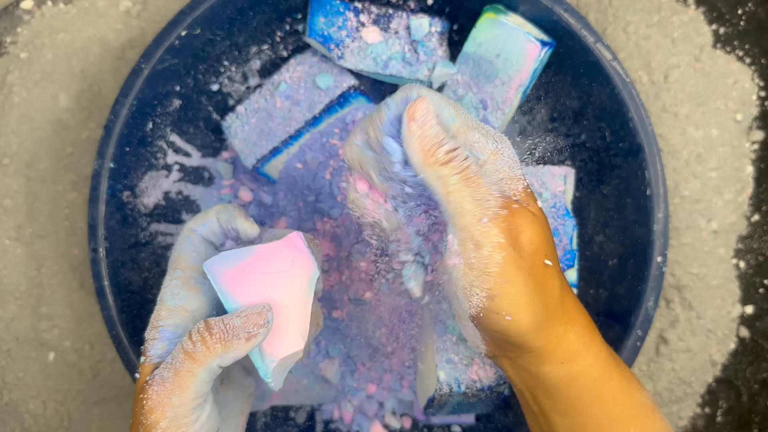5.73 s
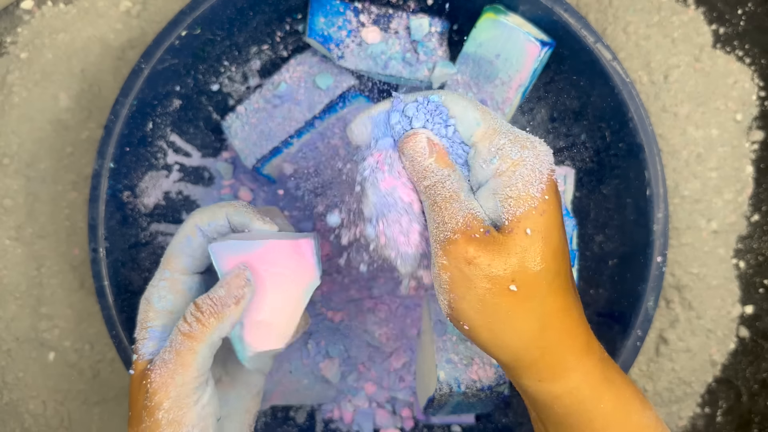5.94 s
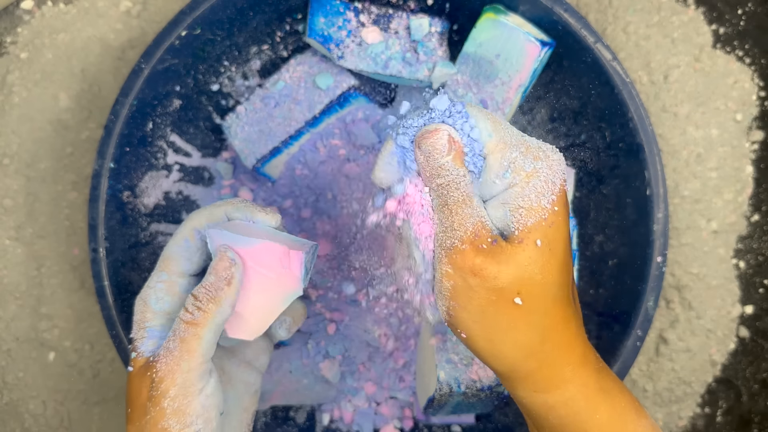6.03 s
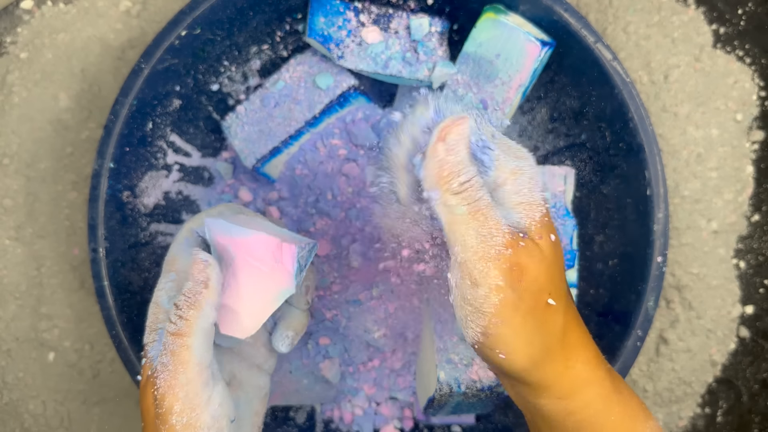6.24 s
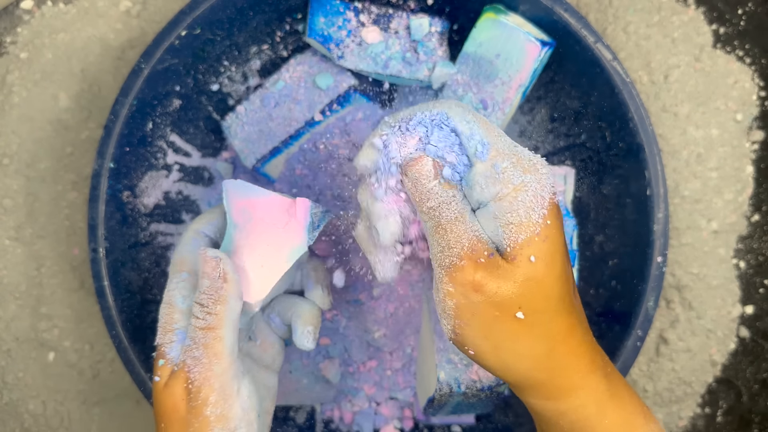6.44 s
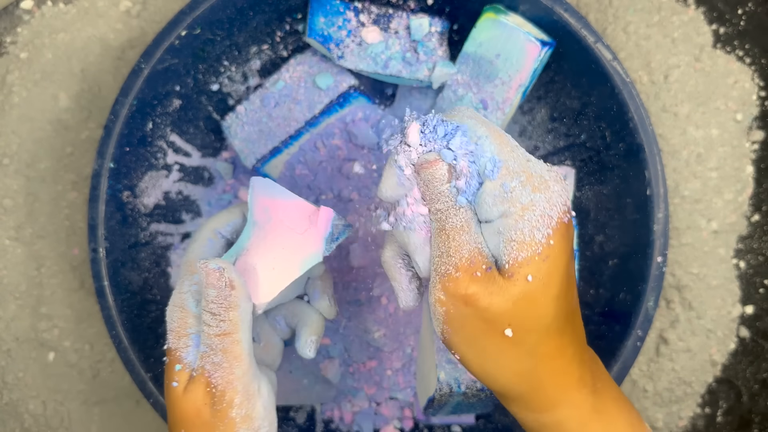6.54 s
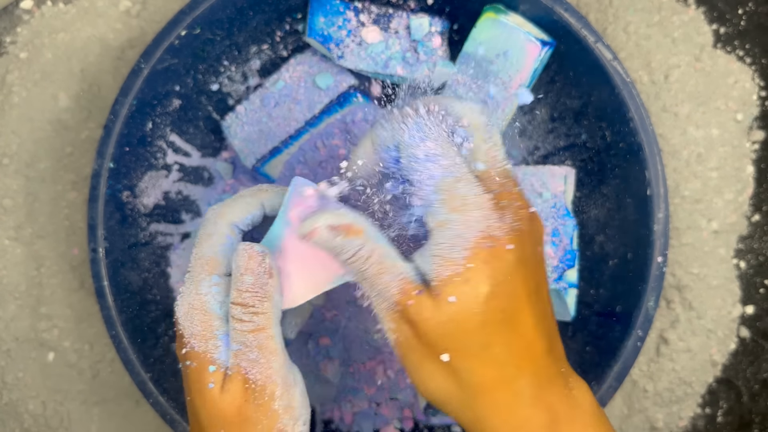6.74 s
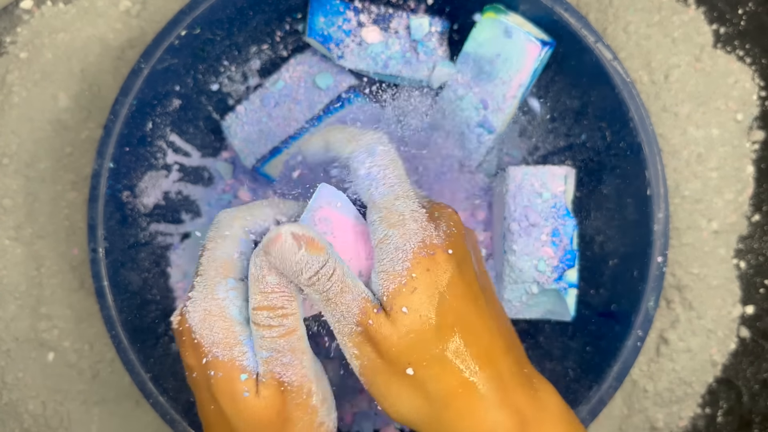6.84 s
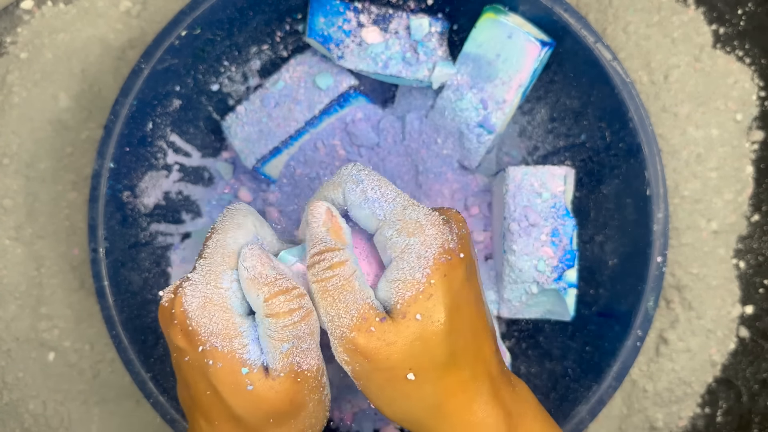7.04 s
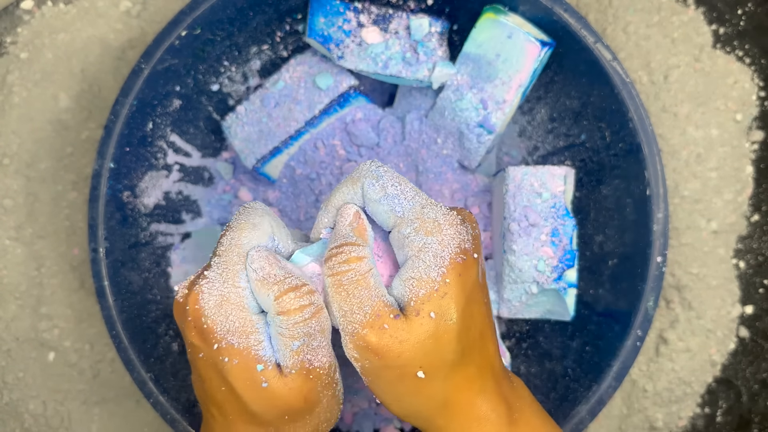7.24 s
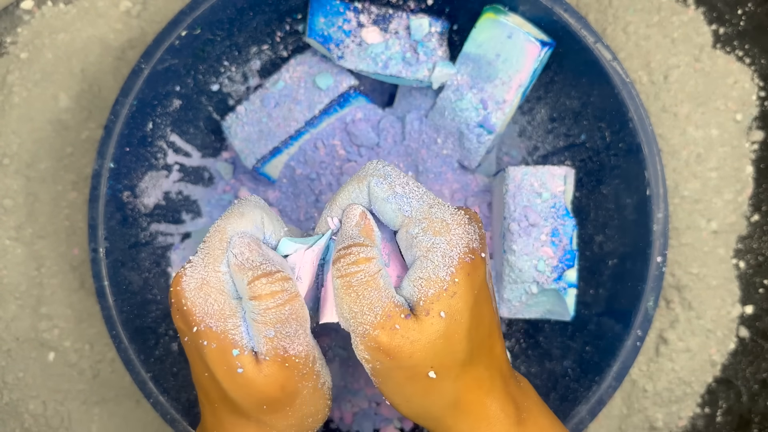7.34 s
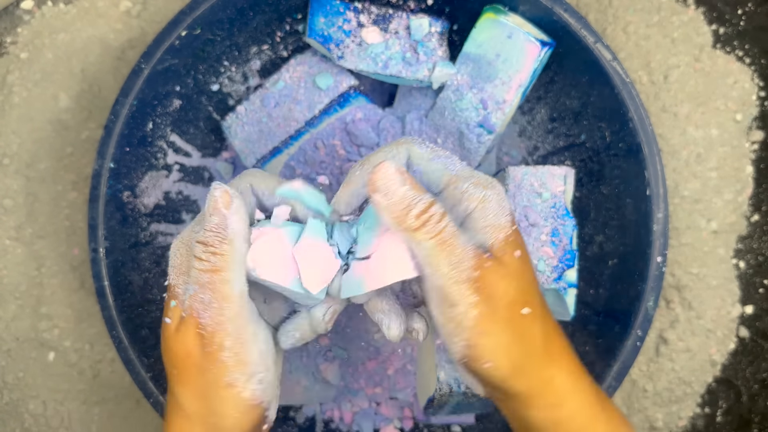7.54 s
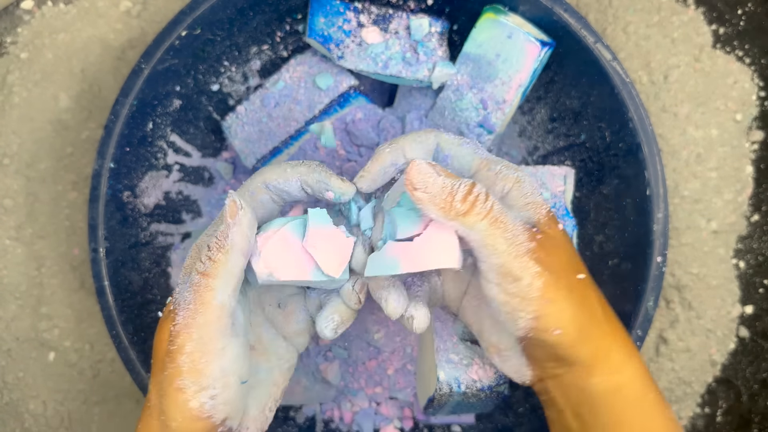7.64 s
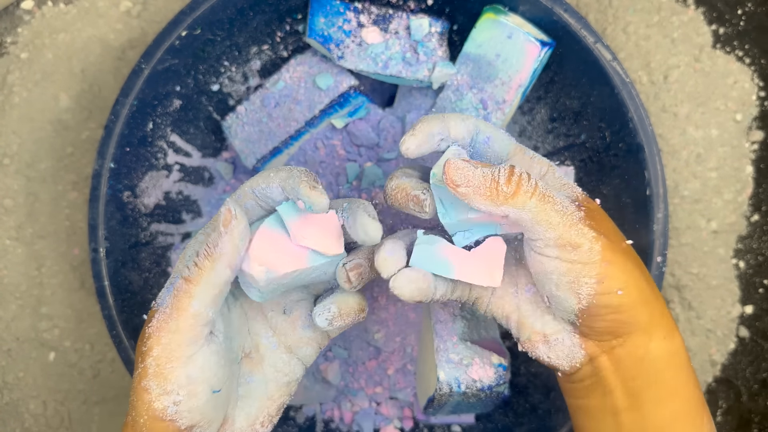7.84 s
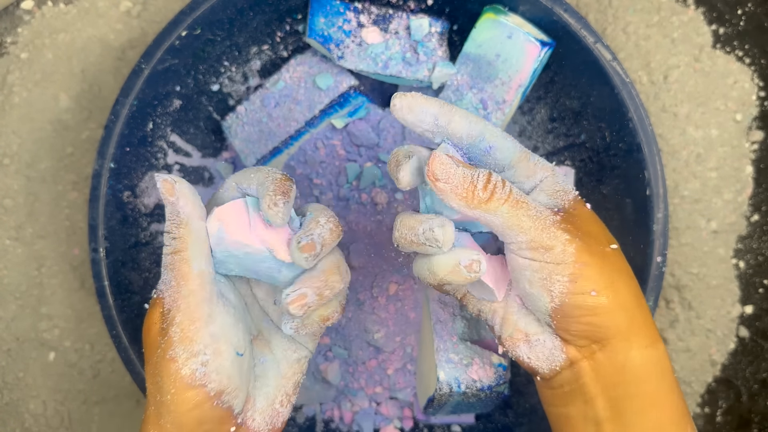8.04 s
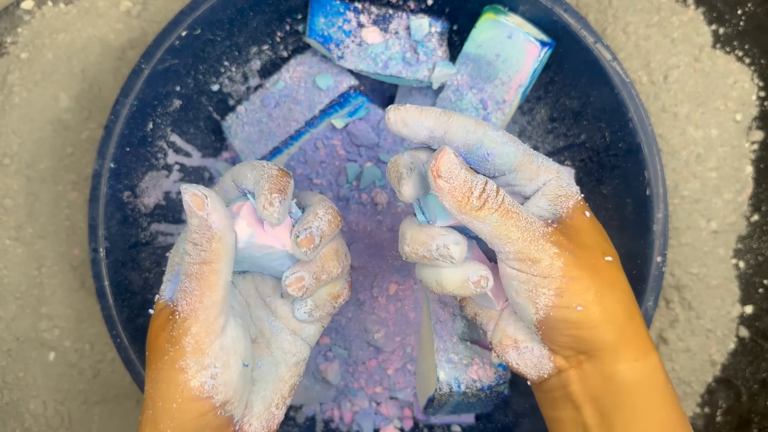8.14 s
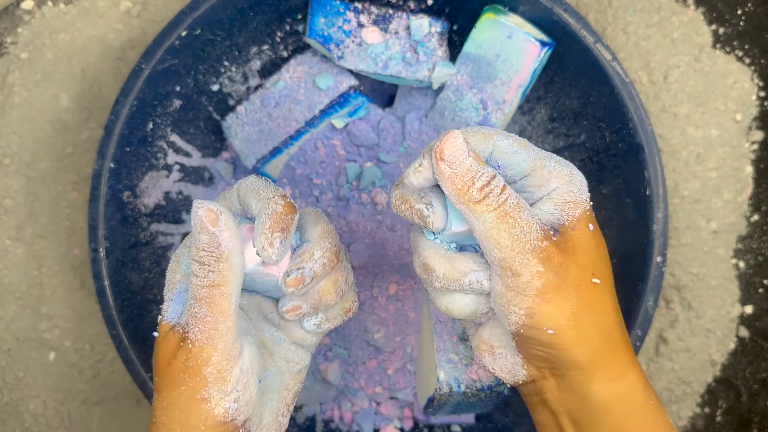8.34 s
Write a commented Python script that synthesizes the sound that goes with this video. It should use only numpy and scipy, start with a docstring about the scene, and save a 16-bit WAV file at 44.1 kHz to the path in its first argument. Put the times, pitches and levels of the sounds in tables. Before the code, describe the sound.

Very close stereo sound of two hands breaking soft chalk over a plastic basin. A violent dry crack comes early, then scattered smaller snaps and gritty squeezing, a dense burst of crunching past the middle, lumps dropping on powder, a dull block collapse and final crackles. Hard walls add a short tail; a distant engine idles faintly.

```python
"""In a hard-walled room, two hands snap and crush soft gym chalk over a plastic basin, close to two ports.
Each fracture is a shaped noise burst: a dry crack, a run of microcracks and a spray of splinters.
Powder, grit and falling crumbs are swarms of tiny ringing clicks; lumps landing are damped resonances.
Faces shear in gritty rushes or squeak faintly, and one block caves in; dense echoes add a short tail.
Behind lie a far idling engine built from sine orders, a mains tone, and noise for rumble and hiss."""
import sys
import numpy as np
from scipy import signal
from scipy.fft import rfft, irfft, next_fast_len
from scipy.io import wavfile

SR = 44100
rng = np.random.default_rng(int(sys.argv[2]) if len(sys.argv) > 2 else 0)


def output_pcm(signal):
    """Save a mono or channel-first signal as 16-bit PCM at the path in sys.argv[1].

    Samples are clipped to [-1, 1] before scaling.
    """
    pcm = np.clip(np.atleast_2d(signal).T, -1, 1) * 32767
    wavfile.write(sys.argv[1], SR, np.round(pcm).astype(np.int16))


N = 369540

# far engine speed: time_s, firing_rate_hz
ENGINE_SPEED = [(0, 16.4), (.45, 16.54), (1.2, 18.1), (1.6, 16.65), (2.6, 17.5), (3.6, 17.69), (4.6, 19.2),
                (5.1, 17.1), (6.6, 18.82), (7.1, 18.2), (7.7, 17.7), (8.38, 17.3)]
# main exhaust orders: time_s, third_order_db, fourth_order_db, fifth_order_db
ENGINE_LEVEL = [(0, -67, -43, -35.5), (.35, -60, -41.5, -34.5), (.48, -60, -46, -48),
                (.63, -61, -46, -36.5), (1.1, -49, -57, -39.5), (1.23, -64, -43, -50), (1.5, -55, -53, -43),
                (1.9, -59.5, -43.5, -40.5), (2.43, -57.5, -44, -36), (2.62, -50.5, -49.5, -40.5),
                (3.04, -45, -40.5, -39.5), (3.45, -52, -42.5, -36.5), (3.78, -54.5, -41.5, -47),
                (4.02, -46, -41.5, -40), (4.45, -60, -51.5, -45), (4.85, -52, -51.5, -47.5),
                (5.3, -62, -47.5, -51), (5.8, -57, -46.5, -57.5), (6.03, -45, -46, -58.5),
                (6.22, -50, -64, -63.5), (6.42, -44.5, -54, -54.5), (6.82, -47, -48, -56),
                (7.05, -52, -68, -61), (7.35, -42.5, -51, -57), (7.65, -56, -63.5, -65),
                (7.8, -48, -53, -61), (8.38, -49, -65, -63.5)]
# weak engine orders: multiple_of_firing_rate, relative_level_db
ENGINE_OVERTONES = [(2, -70), (7, -68.5), (8, -66.5), (9, -68), (10, -63.5), (12, -71.5)]
# spectrum of the surroundings: frequency_hz, relative_density_db
AIR_SPECTRUM = [(15, -27), (45, -6), (90, 4), (150, -10), (300, -14), (600, -21.5), (2000, -31.5),
                (8000, -39.5), (11500, -64.5), (16000, -48)]
HUM_HZ, HUM_DB = 119.3, -65.5

# squeezes of the hand: start_s, hold_end_after_s, relative_grit_db, relative_powder_db
SQUEEZES = [(0, 0.14, -69.5, -69.5), (0.134, 0.12, -82, -66), (0.252, 0.059, -68.5, -54.5),
            (0.379, 0.23, -48.5, -55.5), (0.584, 0.36, -55.5, -55.5), (0.936, 0.33, -53.5, -53.5),
            (1.269, 0.2, -62, -68.5), (1.505, 0.13, -58, -62.5), (1.872, 0.28, -56.5, -58),
            (2.421, 0.12, -63, -57), (2.695, 0.026, -65, -70), (3.297, 0.11, -54.5, -51.5),
            (3.48, 0.14, -60, -54.5), (4.051, 0.082, -63.5, -61), (4.29, 0.23, -64.5, -60),
            (4.525, 0.33, -48, -50), (4.851, 0.23, -51.5, -53.5), (5.124, 0.16, -55.5, -59.5),
            (5.277, .35, -51.5, -55), (5.685, 0.53, -57.5, -56.5), (6.17, 0.34, -57.5, -68.5),
            (6.529, 0.17, -57, -58), (6.787, 0.17, -54, -58), (7.405, .2, -82, -68.5),
            (7.727, 0.27, -65, -57.5), (7.948, 0.31, -59, -57.5), (8.217, 0.2, -57, -55)]
GRIP_S, LET_GO_S = 0.025, 0.031  # linear rise, and time constant of the release
RESTING_GRIT_DB, RESTING_POWDER_DB = -87, -80  # chalk shifting in a loose hand, relative levels
# spectra of coarse grit, fine powder and a single crumb's tick: frequency_hz, relative_density_db
GRIT_SPECTRUM = [(150, -28.5), (500, -11), (1150, -6), (1650, -5), (2400, 0), (3500, -5), (5000, -12),
                 (8000, -27), (16000, -48.5)]
POWDER_SPECTRUM = [(1000, -29.5), (3500, -10), (5000, -18.5), (6700, -2), (9300, -0.5), (10600, -13.5),
                   (12500, -26.5), (15000, 5.5), (16500, -10)]
TICK_SPECTRUM = [(200, -25), (700, -4.5), (1500, -0.5), (2600, 1), (4500, -2.5), (7500, -4.5), (11000, -20),
                 (16000, -18.5)]

# handfuls of crumbs pouring on the heap: start_s, hold_end_after_s, relative_patter_db, relative_clatter_db
SPILLS = [(0, 0.03, -54, -69), (0.496, 0.08, -46, -49), (0.623, 0.27, -59, -67.5),
          (1.739, 0.17, -56, -56.5), (3.412, 0.33, -60, -63.5), (3.64, .1, -54.5, -57.5),
          (3.935, 0.1, -51, -58.5), (4.48, 0.27, -56.5, -59), (5.452, 0.42, -58.5, -58),
          (5.762, 0.16, -56, -50), (5.925, 0.24, -55, -57.5), (6.329, 0.059, -65.5, -60.5),
          (6.806, 0.089, -55, -60), (6.96, 0.037, -67, -55), (8.196, 0.34, -59, -64)]
FALL_S, TRICKLE_S = 0.0067, 0.023  # a handful starts to land, and thins out (time constant)
# spectra of crumbs on the heap and on blocks: frequency_hz, relative_density_db
HEAP_SPECTRUM = [(100, -13.5), (300, 2), (450, 0.5), (630, 2), (850, 0), (1200, -13), (2000, -11.5),
                 (5000, -30.5)]
CLATTER_SPECTRUM = [(350, -23), (750, 3), (1100, 1.5), (1900, -6), (3000, -18.5), (7000, -35)]

# smooth faces rubbing: middle_s, swell_and_fade_s, level_db, middle_pitch_hz, width_hz, glide_hz_per_s
SQUEAKS = [(.02, 0.06, -62.5, 1920, 300, -1), (.227, 0.015, -45.5, 3850, 260, 7000),
           (.278, .01, -52.5, 3760, 700, 0), (3.78, 0.13, -64, 1960, 400, -3),
           (7.42, 0.08, -64, 1776, 340, -300)]
# layers shearing off: middle_s, half_length_s, relative_level_db, pitch_hz
SHEARS = [(0.117, 0.015, -57.5, 2600), (0.314, 0.03, -53, 4000), (0.363, 0.0049, -43.5, 2700),
          (0.70, 0.019, -50.5, 2900), (0.795, 0.026, -47, 3200), (0.873, 0.011, -42.5, 2990),
          (0.93, .012, -50, 5000), (1.015, 0.029, -43, 2988), (1.157, .04, -52.5, 3600),
          (1.369, 0.026, -49.5, 3010), (2.338, 0.011, -54, 6520), (2.431, 0.044, -49.5, 3007),
          (2.509, 0.033, -43.5, 3130), (2.9, 0.016, -53, 2000), (3.199, 0.02, -40, 3130),
          (3.342, 0.027, -41, 7060), (3.52, 0.025, -40.5, 6500), (3.629, 0.024, -46, 3600),
          (3.901, 0.023, -54, 2283), (4.212, 0.03, -38, 4500), (4.636, 0.014, -24, 3440),
          (5.351, 0.019, -48, 3990), (5.966, 0.038, -45, 6500), (6.611, 0.03, -43, 2670),
          (6.779, 0.024, -54, 4500), (6.839, 0.0043, -34, 4800), (6.863, 0.023, -51, 3000),
          (7.082, 0.0077, -58.5, 2000), (7.77, 0.019, -46.5, 3300), (7.831, 0.017, -52, 2600),
          (7.941, 0.017, -48, 5000), (7.988, 0.024, -42, 2650), (8.265, 0.018, -48, 2800)]
# clear fractures: main_break_s, energy_db, piece_pitch_hz, bass_db, treble_db
SNAPS = [(0.3708, 9, 950, -9.5, -10), (0.404, 0, 3900, 7.5, -8.5), (0.415, -2.5, 3614, 4, -4),
         (0.4828, 14.5, 2425, -4.5, -20), (0.484, 14, 8170, 10, -11.5), (0.4885, 11, 1395, -11, -13),
         (0.5638, -7, 1350, -4.5, 0), (0.5713, -7, 1900, 4.5, 10.5), (0.7245, -9, 1540, -4, -17),
         (1.106, -11, 8000, 3, -22.5), (1.121, -21, 3500, -2.5, 0), (1.1531, -16.5, 1184, 3.5, 2.5),
         (1.227, -24, 2140, 3, -10.5), (1.249, -29, 2410, -1.5, -11), (1.496, -25, 1990, 0, -3.5),
         (1.749, -32.5, 2000, -5.5, -2.5), (1.299, -20, 1700, -6, -4), (1.427, -25.5, 1500, -3, -3),
         (1.536, -20, 2180, 1.5, -22.5), (1.563, -19, 1630, 0, 1.5), (1.691, -22, 1735, -0.5, -16.5),
         (1.5942, -16.5, 4590, 8.5, 17), (1.8237, 5.5, 1332, -1.5, -6), (2.031, -12, 2840, -13, -3),
         (2.1011, -8, 1304, 7.5, 13.5), (2.138, -17, 4580, -3.5, -2), (2.486, -8.5, 2610, -18, -11.5),
         (2.5324, -7.5, 1910, 0, 0.5), (2.7583, -24.5, 4550, -4, -12), (2.9622, -14, 6000, -14, 14),
         (2.962, 8, 805, -33.5, 5), (2.9696, -5, 2620, 6.5, -4), (3.227, -11.5, 3640, 3, 9),
         (3.4663, -14.5, 1382, -11, -9), (3.5764, -14, 4010, 21.5, -7), (3.8237, -22, 1630, 22, 16),
         (3.9356, 7, 910, 1.5, 11), (3.941, -2.5, 3274, 24, 1.5), (3.9479, -0.5, 2100, -10.5, -24.5),
         (3.9564, -3.5, 1624, -9, -2), (3.9624, 7.5, 2110, 7, -1.5), (4.1742, -9.5, 1630, 0.5, 1.5),
         (4.452, -0.5, 2700, -22, 11), (4.454, 1.5, 1770, 7.5, 3), (4.4643, 6.5, 797, -8, 8),
         (4.507, -6, 785, 13.5, 22.5), (4.559, -4, 5100, 4.5, -6), (4.5679, -2.5, 802, -3, 0),
         (4.5806, 1.5, 2300, -1, -15), (4.584, 3.5, 4220, 17.5, 3.5), (4.5992, 5, 3700, -3, 14.5),
         (4.605, 8, 802, -17, -6), (4.606, -5, 4550, 16.5, -4), (4.629, 12, 3920, 8, -7),
         (4.6412, 1.5, 4180, 4, -18), (4.7112, 6.5, 1483, -11.5, -2.5), (4.7348, -4.5, 4510, -7.5, -15),
         (4.7648, 5, 2590, -14, -4), (4.7679, 9, 1400, -3, -4), (4.786, 3.5, 6930, -17, -27),
         (4.8142, -1, 4970, 6, -4.5), (4.8801, -1, 4900, -0.5, 2), (4.8981, -0.5, 2240, 5, 5),
         (4.938, 0.5, 2270, -5, 13), (5.0946, -6.5, 4990, 2, -4), (5.1203, -10.5, 3900, -7, -6),
         (5.1718, -17.5, 3670, 11.5, 18.5), (5.246, -18, 2300, -8.5, 0), (5.380, -19.5, 2200, -3, -7.5),
         (5.548, -16.5, 1173, -4, -16.5), (5.582, -28, 1300, -2, -7), (5.646, -9.5, 7400, -4, -15),
         (5.701, -18.5, 1037, -2.5, -1), (5.798, -10.5, 1845, 3, -15), (5.973, -19, 1700, -1, -9.5),
         (6.330, -14.5, 1196, 16.5, -26.5), (6.493, -21, 6770, -7, 3.5), (6.835, -8.5, 4550, -1, -0.5),
         (6.854, -14.5, 1970, -0.5, -16.5), (6.968, -14, 1595, -9.5, -13.5), (7.078, -23.5, 1900, -4, 3.5),
         (7.259, -1, 1017, 17, -5), (7.2632, 0.5, 1715, 13.5, 8.5), (7.3313, -21, 7390, 18, 7),
         (7.712, -19.5, 3640, 35.5, 27.5), (7.821, -18.5, 890, -9, -4), (8.018, -9, 2255, 4, 7.5),
         (8.113, -9, 849, -1.5, 11), (8.202, -10, 3640, -7, 3), (8.2289, 1.5, 1860, -4.5, -13.5),
         (8.284, -2.5, 1200, -14, 4.5), (8.249, -13, 7000, -6, 3.5), (8.287, -3, 4930, 0.5, -5),
         (8.304, -15, 7450, -6, 5), (8.375, -15.5, 1486, 3.5, 2)]
# spectrum common to the fractures: frequency_hz, relative_density_db
CRACK_SPECTRUM = [(60, -14.5), (200, -2), (320, 1), (630, -2.5), (950, -1), (1600, -1.5), (2500, -0.5),
                  (3200, -2.5), (4700, -6), (6500, -3), (8500, -2), (11200, -5), (15500, -6.5)]
# crumbs trickling out of the fist: start_s, hold_end_after_s, level_db
TRICKLES = [(0.979, .4, -60), (1.483, 0.19, -61), (4.95, 0.168, -56), (5.216, 0.64, -53),
            (5.753, .4, -56.5), (6.177, 0.39, -60)]
# their spectrum: frequency_hz, relative_density_db
CRUMB_SPECTRUM = [(300, -22), (800, -5), (1400, 0), (2400, -3.5), (4000, -8.5), (6500, -7), (10000, -20.5),
                  (16000, -31)]
# lumps landing in the basin and dull breaks inside the fist: start_s, energy_db, pitch_hz, bass_db
THUDS = [(1.396, -16, 835, 3), (3.650, -7.5, 750, 13.5), (3.668, -10, 786, 4), (3.686, -19, 850, -0.5),
         (3.712, -23.5, 900, 0), (4.583, -15.5, 600, 11), (4.630, -12.5, 620, 13), (5.290, -27.5, 520, 2),
         (5.525, -16.5, 687, 5), (5.749, -7, 760, -2.5), (5.757, -0.5, 800, 1.5), (5.758, -3, 1950, -6),
         (5.783, -10.5, 1020, 2), (5.798, -14, 893, 9.5), (5.811, -16.5, 1500, -3), (5.827, -20.5, 1103, 5),
         (5.8548, -4.5, 720, -2), (5.8565, -10.5, 1500, -6), (5.908, -15, 900, 1.5),
         (5.949, -14.5, 858, 4.5), (5.986, -20, 604, 13.5), (6.013, -21, 1107, 4), (6.052, -20, 890, 0.5),
         (6.129, -25.5, 790, -3), (6.33, -17.5, 520, 15), (6.567, -19.5, 1596, 5.5), (6.738, -26, 1524, 4),
         (6.815, -14.5, 770, 0), (6.969, -9.5, 850, -17.5), (7.257, -11, 478, 6.5), (7.2636, -9, 518, 27),
         (7.304, -17.5, 480, 16), (7.718, -26, 376, 17.5), (8.113, -19, 904, -3)]
# resonances of the hollow between the fists: frequency_hz, sharpness_q, relative_level_db
FIST_MODES = [(160, 2, -8), (450, 2, -5.5), (1780, 5, -11)]
CAVE_IN_S = 0.036  # time constant of the caving block

# reverberation of the walls: frequency_hz, decay_t60_s
WALL_DECAY = [(150, 0.2), (400, 0.56), (800, 0.27), (2500, 0.5358), (7000, 0.29), (15000, 0.16)]
# strength of the reflections: frequency_hz, relative_gain_db
WALL_GAIN = [(100, 3), (350, 3.5), (750, 3.5), (1500, -4.5), (2600, -4), (4500, 3), (7000, 6.5),
             (10000, 7.5), (12500, 0), (15500, 9)]
# width of the reflections: frequency_hz, gain_of_the_part_that_differs_between_ports
WALL_SPREAD = [(100, .4), (350, 0.67), (700, 1.2), (1400, 0.61), (2500, 1.7), (4500, 1.5), (9000, 0.15),
               (12000, 0.13), (16000, .3)]
# phase between the ports: frequency_hz, left_lead_rad
PORT_PHASE = [(0, 0), (3000, 1), (4700, 1.39), (6500, -0.6), (8500, -1.95), (10400, -2), (12300, -4),
              (16000, -2)]
EDGE_HZ = 16500  # upper band limit


def gain_of(db):
    """Level: decibels to amplitude."""
    return 10 ** (np.asarray(db) / 20)


def evened(x):
    """Normalisation: scales to an rms of one."""
    return x / np.sqrt(np.mean(x ** 2) + 1e-20)


def read(points, hz):
    """Interpolation: a spectrum joined by straight lines over log frequency."""
    f, value = np.transpose(points)
    return np.interp(np.log(hz + 1), np.log(f + 1), value)


def follow(rows):
    """Interpolation: the columns of a curve table at every sample."""
    s, *columns = np.transpose(rows)
    return [np.interp(np.arange(N) / SR, s, c) for c in columns]


def add(mix, s, sound):
    """Superposition: mixes a sound in at time s."""
    part = mix[max(round(s * SR), 0):][:len(sound)]
    part += sound[:len(part)]


def drift(per_s, order=32):
    """Slow random modulation: noise below per_s Hz, of rms one, on knots every `order` samples."""
    knots = np.arange(0, N + order, order)
    kept = np.fft.rfftfreq(len(knots), order / SR) < per_s
    slow = irfft(rfft(rng.standard_normal(len(knots))) * kept, len(knots))
    return np.interp(np.arange(N), knots, evened(slow))


def circle(size=1024):
    """Discrete spectrum: frequencies round the full FFT circle, in Hz."""
    return abs(np.fft.fftfreq(size, 1 / SR))


def causal(db):
    """Minimum phase: the sharpest causal response with these gains on the circle, of energy one."""
    log_spectrum = np.conj(signal.hilbert(np.log(gain_of(db))))
    response = np.fft.ifft(np.exp(log_spectrum)).real
    return response / np.linalg.norm(response)


def hump(hz, centre_hz, q):
    """Resonance: gain in dB of one damped mode."""
    detuning = (hz + 1) / centre_hz - centre_hz / (hz + 1)
    return -10 * np.log10(1 + (q * detuning) ** 2)


def swell(length_s, rise_s, fade_s):
    """Envelope: linear attack, hold until length_s and exponential release."""
    t = np.arange(2 * SR) / SR
    return np.minimum(t / rise_s, 1) * np.exp(-np.maximum(t - length_s, 0) / fade_s)


def grains(per_s, spread_db, spectrum, q=3.4, flurry_db=1.5, flurries_per_s=30, count=10):
    """Granular fracture: countless ringing clicks, few of them large, each pitch in its own flurries."""
    hz, length = circle(), next_fast_len(N, True)
    tints = np.array([hump(hz, pitch_hz, q) for pitch_hz in np.geomspace(700, 10000, count)])
    # together the pitches add up to the given spectrum
    tints += read(spectrum, hz) - 10 * np.log10((gain_of(tints) ** 2).sum(0))
    when, kind, luck, side = rng.random((int(per_s * N / SR), 4)).T
    kind, when = (kind * count).astype(int), (when * N).astype(int)
    flurries = np.array([drift(flurries_per_s) for _ in tints])
    size_db = spread_db * np.minimum(-np.log(1 - luck), 5)
    size_db += flurry_db * np.minimum(flurries[kind, when], 1.5)
    clicks = np.zeros((count, length), np.float32)
    clicks[kind, when] = np.sign(side - .5) * gain_of(size_db)
    rings = np.array([np.linalg.norm(gain_of(tint)) * causal(tint) for tint in tints], np.float32)
    return evened(irfft((rfft(clicks) * rfft(rings, length)).sum(0), length)[:N])


def engine(overtones_db=1.5, wobble=0.003, waver_db=1.47, unsteady=0.25, load=0.55):
    """Harmonic series: orders of an unsteady firing rate, each swelling and fading on its way."""
    firing_hz = follow(ENGINE_SPEED)[0] * (1 + wobble * drift(13.0))
    turns = 2 * np.pi * np.cumsum(firing_hz) / SR
    levels = follow(ENGINE_LEVEL)
    orders = [(order, db + waver_db * drift(5)) for order, db in zip(range(3, 6), levels)]
    # the weak orders partly follow the level of the fifth
    load_db = overtones_db + load * (levels[-1] - levels[-1].mean())
    orders += [(round(order), db + load_db + 2.5 * drift(4.0)) for order, db in ENGINE_OVERTONES]
    waves = [gain_of(db) * np.sin(order * turns + unsteady * drift(4.8)) for order, db in orders]
    return np.sqrt(2) * sum(waves)


def hum():
    """Pure tone: a faint steady mains hum nearby."""
    return np.sqrt(2) * gain_of(HUM_DB) * np.sin(2 * np.pi * HUM_HZ * np.arange(N) / SR)


def air(level_db=-55.0, apart=0.89):
    """Diffuse field: low rumble and faint hiss, partly shared between the ports."""
    colour = gain_of(read(AIR_SPECTRUM, np.fft.rfftfreq(N, 1 / SR)))
    shared, side = irfft(rfft(rng.standard_normal((2, N))) * colour, N)
    return gain_of(level_db) * evened(np.array([shared + apart * side, shared - apart * side]))


def pressure():
    """Energy addition: strength of grit and powder as each squeeze rises, holds and dies away."""
    grit_power = np.full(N, gain_of(RESTING_GRIT_DB) ** 2)
    powder_power = np.full(N, gain_of(RESTING_POWDER_DB) ** 2)
    for s, length_s, grit_db, powder_db in SQUEEZES:
        grip = swell(length_s, GRIP_S, LET_GO_S)
        add(grit_power, s, (gain_of(grit_db) * grip) ** 2)
        add(powder_power, s, (gain_of(powder_db) * grip) ** 2)
    return np.sqrt(grit_power), np.sqrt(powder_power)


def crumbling(grit, powder, grit_db=0.5, powder_db=5.0, clump_db=0.5, clumps_per_s=28):
    """Common modulation: grit and powder give way together in small slips."""
    slips_db = clump_db * drift(clumps_per_s)
    coarse = grains(per_s=1200, spread_db=3.5, spectrum=GRIT_SPECTRUM, flurry_db=3.0)
    fine = grains(per_s=5700, spread_db=4.5, spectrum=POWDER_SPECTRUM)
    return grit * gain_of(grit_db + slips_db) * coarse + powder * gain_of(powder_db + slips_db) * fine


def palms(x, echo=0.41, near_s=0.0009, far_s=0.0026, sway=0.08, moves_per_s=5, count=3):
    """Comb filtering: quick echoes off the palms and the rim shift as the fingers move."""
    now, out = np.arange(N), x
    for delay_s in np.geomspace(near_s, far_s, count):
        late = np.round(SR * delay_s * (1 + sway * drift(moves_per_s))).astype(int)
        out = out + echo * x[np.clip(now - late, 0, N - 1)]
        echo = -echo  # the echoes alternate in sign
    return out / np.sqrt(1 + count * echo ** 2)


def crackle(grit, level_db=-2.0):
    """Impulsive fracture: sparse crumbs in the grinding powder give way with tiny broad ticks."""
    return grit * gain_of(level_db) * grains(per_s=220, spread_db=3.5, spectrum=TICK_SPECTRUM, q=1.6)


def patter(grit, level_db=-0.5, shed_db=-15, resting_db=-79):
    """Multiple impact: crumbs shed by squeezes and spills rain softly on the heap; larger bits clatter."""
    soft_power = (gain_of(shed_db) * grit) ** 2 + gain_of(resting_db) ** 2
    hard_power = np.zeros(N)
    for s, length_s, soft_db, hard_db in SPILLS:
        flow = gain_of(level_db) * swell(length_s, FALL_S, TRICKLE_S)
        add(soft_power, s, (gain_of(soft_db) * flow) ** 2)
        add(hard_power, s, (gain_of(hard_db) * flow) ** 2)
    soft = np.sqrt(soft_power) * grains(per_s=2700, spread_db=4.5, spectrum=HEAP_SPECTRUM)
    return soft + np.sqrt(hard_power) * grains(per_s=700, spread_db=3.0, spectrum=CLATTER_SPECTRUM)


def squeaks():
    """Friction: narrow-band noise about a gliding pitch as smooth chalk faces rub."""
    t, out = np.arange(-SR // 3, SR // 3) / SR, np.zeros(N + SR)
    for s, length_s, db, hz, width_hz, glide in SQUEAKS:
        lowpass = signal.butter(2, width_hz / 2, fs=SR)
        flutter = signal.lfilter(*lowpass, rng.standard_normal((2, len(t))))
        turns = 2 * np.pi * (hz * t + glide * t ** 2 / 2)
        slip = np.exp(-(t / length_s) ** 2)
        rub = evened(slip * (flutter[0] * np.cos(turns) + flutter[1] * np.sin(turns)))
        rub *= np.sqrt(np.mean(slip ** 2))
        add(out, 1 + s + t[0], gain_of(db) * rub)  # one spare second ahead holds early swells
    return out[SR:]


def shears(level_db=-2, q=0.84, top_hz=9500, slip_db=2.5, slips_per_s=140):
    """Stick-slip: a dense swarm of grains swells and fades as two faces slide over each other."""
    out, hz = np.zeros(N), circle()
    for s, half_s, db, pitch_hz in SHEARS:
        t = np.arange(-3 * half_s, 3 * half_s, 1 / SR)
        swarm = rng.standard_normal(SR // 2)[:len(t)] ** 3  # cubing makes the noise spiky
        colour = hump(hz, pitch_hz, q) - 10 * np.log10(1 + (hz / top_hz) ** 12)
        rush = signal.fftconvolve(swarm, causal(colour))[:len(t)]
        add(out, s + t[0], gain_of(db + level_db) * evened(rush) * np.exp(-(t / half_s) ** 2))
    return out * gain_of(slip_db * drift(slips_per_s))


def snaps(run=0.93, spray=0.37, blow=0.41):
    """Brittle fracture: a main break, a run of microcracks around it, then a thin spray of splinters."""
    rise_s, run_s, spray_s = 0.001, 0.00089, 0.0089
    run_hz, bass_hz, treble_hz, q = 1500, 900, 5000, 2.5
    out, hz = np.zeros(N), circle()
    age = np.arange(2048) / SR - rise_s  # time since the main break
    run_shape = np.exp(np.where(age < 0, 2 * age / rise_s, -age / run_s))
    spray_shape = np.exp(-abs(age / spray_s)) * (age > 0)
    highpass = signal.butter(1, run_hz, "high", fs=SR)
    main_break = np.array([.9, .4])
    for s, db, piece_hz, bass, treble in SNAPS:
        fine, coarse = rng.standard_normal((2, len(age)))
        running = signal.lfilter(*highpass, fine * run_shape)
        splinters = coarse * abs(coarse) * spray_shape
        force = run * running / np.linalg.norm(running) + spray * splinters / np.linalg.norm(splinters)
        force[np.argmin(abs(age)):][:len(main_break)] += blow * main_break
        # big pieces sound low, thin edges bright
        shelves = bass / (1 + (hz / bass_hz) ** 2) + treble * hz ** 4 / (hz ** 4 + treble_hz ** 4)
        colour = read(CRACK_SPECTRUM, hz) + .5 * hump(hz, piece_hz, q) + shelves
        crack = signal.fftconvolve(force, causal(colour))
        add(out, s - rise_s, gain_of(db) * crack / np.linalg.norm(crack))
    return out


def trickle():
    """Discrete impact: loose crumbs tick one by one against the blocks below."""
    flow = np.zeros(N)
    for s, length_s, db in TRICKLES:
        add(flow, s, gain_of(db) * swell(length_s, FALL_S, TRICKLE_S))
    return flow * grains(per_s=310, spread_db=1.5, spectrum=CRUMB_SPECTRUM, q=1.6, flurry_db=2.0)


def thuds(q=2.7, settle=0.086, settle_s=0.0039, dull_hz=2700, bass_hz=430):
    """Damped impact: a soft lump rings briefly and settles in powder; a heavy one thumps the basin."""
    out, t, hz = np.zeros(N), np.arange(2048) / SR, circle()
    for s, db, lump_hz, bass in THUDS:
        force = settle * rng.standard_normal(len(t)) * np.exp(-t / settle_s)
        force[0] = 1  # the blow itself
        shelves = bass / (1 + (hz / bass_hz) ** 4) - 10 * np.log10(1 + (hz / dull_hz) ** 6)
        colour = hump(hz, lump_hz, q) + .5 * hump(hz, 1400, 0.49) + shelves
        knock = signal.fftconvolve(force, causal(colour))
        add(out, s, gain_of(db) * knock / np.linalg.norm(knock))
    return out


def collapse(s=7.263, level_db=-35, bits_per_s=520):
    """Cavity resonance: a fresh block caves in bit by bit and rings the hollow between the fists."""
    t, out = np.arange(SR // 2) / SR, np.zeros(N)
    rubble = evened(rng.choice([-1., 1.], len(t)) * (rng.random(len(t)) < bits_per_s / SR))
    hollow = sum(gain_of(db) * causal(1.5 * hump(circle(), hz, q)) for hz, q, db in FIST_MODES)
    hollow /= np.linalg.norm(hollow)
    add(out, s, gain_of(level_db) * signal.fftconvolve(rubble * np.exp(-t / CAVE_IN_S), hollow))
    return out


def walls(x, delay_s=0.0013, early=1.0, early_s=0.0087, taps_per_s=5000):
    """Reverberation: dense reflections, strongest at first, each band dying at its own speed."""
    t = np.arange(SR * 3 // 4) / SR
    taps = rng.choice([-1., 1.], (2, len(t))) * (rng.random((2, len(t))) < taps_per_s / SR)
    taps *= (t > delay_s) * (1 + early * np.exp(-t / early_s))
    hz, age, z = signal.stft(taps, SR, nperseg=256)
    z[1] *= read(WALL_SPREAD, hz)[:, None]
    decay_db = read(WALL_GAIN, hz)[:, None] - 60 * age / read(WALL_DECAY, hz)[:, None]
    tail = signal.istft(z * gain_of(decay_db), SR, nperseg=256)[1]
    shared, side = tail / np.linalg.norm(tail[0])
    response = np.float32([shared + side, shared - side])
    return signal.fftconvolve(np.float32([x]), response, axes=1)[:, :N]


def room(x, turns_per_s=0.805, count=3):
    """Changing sound paths: as the hands move, sound passes between patterns of reflections."""
    angle = 2 * np.pi * turns_per_s * np.arange(N) / SR
    patterns = [walls(x * np.cos(angle + np.pi * k / count)) for k in range(count)]
    return np.sqrt(2 / count) * sum(patterns)


def ports(x, lag_s=0.0016, lag_hz=1200):
    """Phase and dispersion: the ports differ in phase by frequency, and bass trails treble."""
    length = next_fast_len(N + 2048, True)
    hz = np.fft.rfftfreq(length, 1 / SR)
    trail = 2 * np.pi * lag_s * lag_hz * np.arctan(hz / lag_hz)
    lead = .5 * np.array([[1], [-1]]) * read(PORT_PHASE, hz)
    return irfft(rfft(x, length) * np.exp(1j * (lead - trail)), length)[:, :N]


def scene(snap_wet_db=-9.5, basin_wet_db=-4.5, crumble_wet_db=-8.0):
    """Superposition: the chalk close by, the basin below, their reflections, and the background."""
    background = engine() + hum() + air()
    grit, powder = pressure()
    crumbs = palms(crumbling(grit, powder) + shears()) + crackle(grit) + trickle()
    lumps = patter(grit) + thuds() + collapse()
    cracks = snaps()
    # the walls hear each break from all sides, so its ragged colour evens out in the tail
    all_round = snaps(run=0.066, spray=0.12)
    sent = gain_of(snap_wet_db) * all_round + gain_of(basin_wet_db) * lumps
    sent = sent + gain_of(crumble_wet_db) * crumbs
    return ports(cracks + lumps + crumbs + squeaks() + room(sent)) + background


def record(dry):
    """Overload and band limit: peaks beyond full scale flatten, then the top of the treble is removed."""
    lowpass = signal.firwin(511, EDGE_HZ, window=("kaiser", 9), fs=SR)
    return signal.oaconvolve(np.clip(dry, -1, 1), lowpass[None], "same")


dry = scene()
out = record(dry)
output_pcm(out)
```